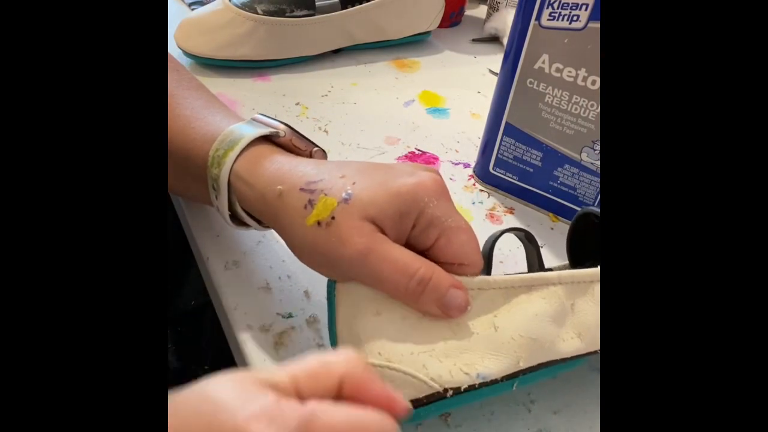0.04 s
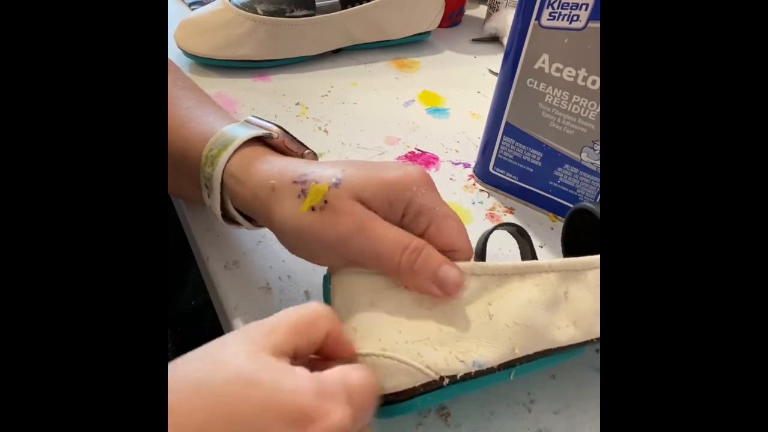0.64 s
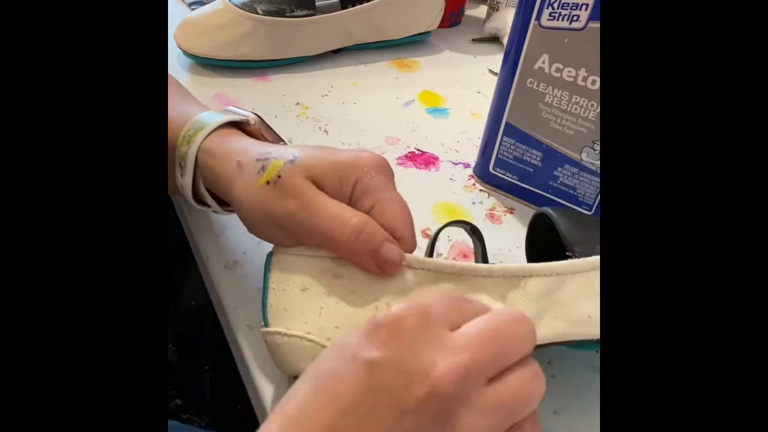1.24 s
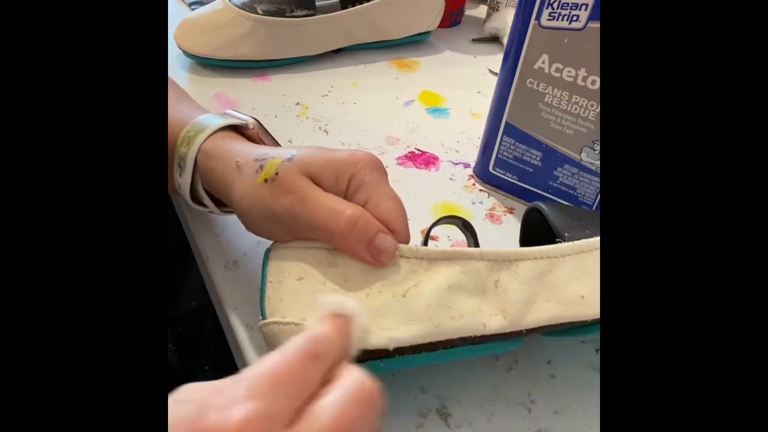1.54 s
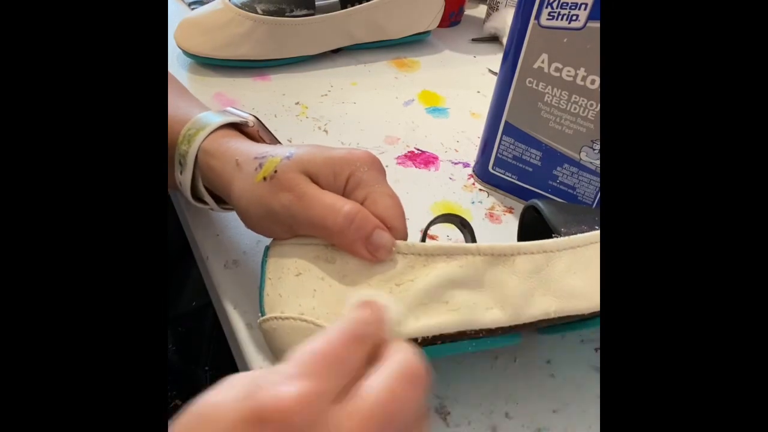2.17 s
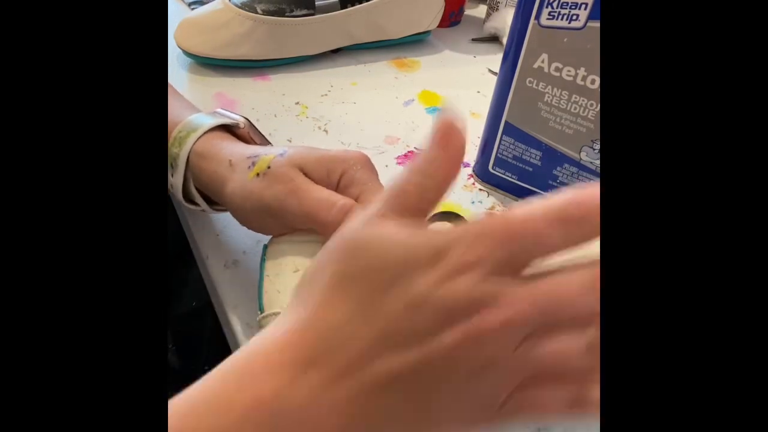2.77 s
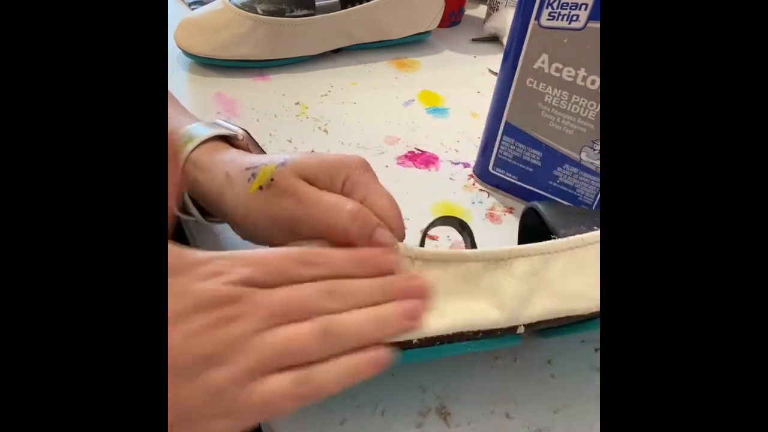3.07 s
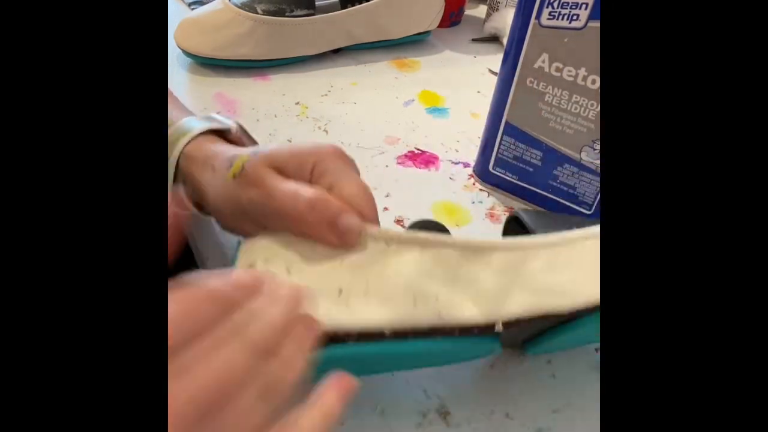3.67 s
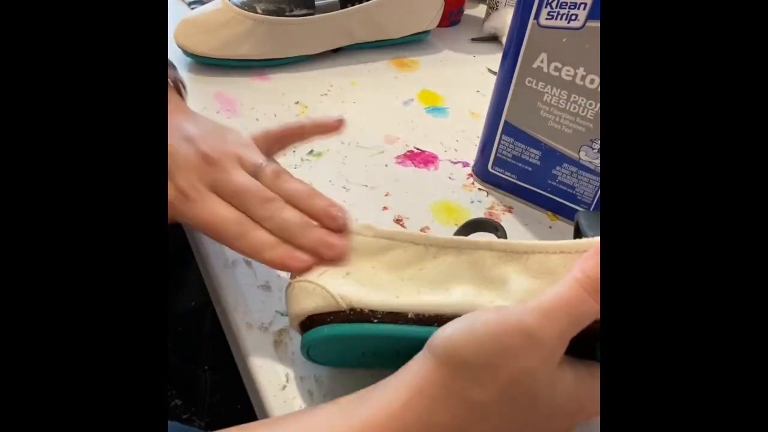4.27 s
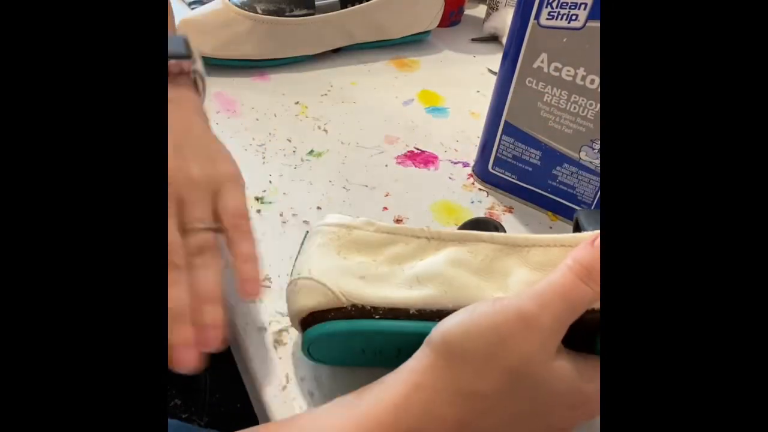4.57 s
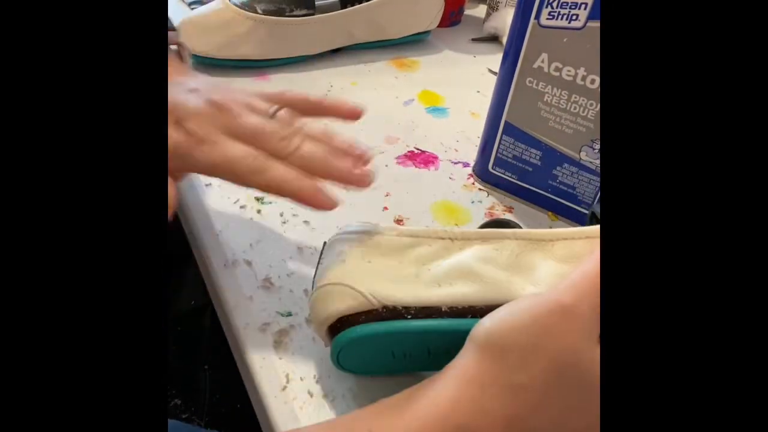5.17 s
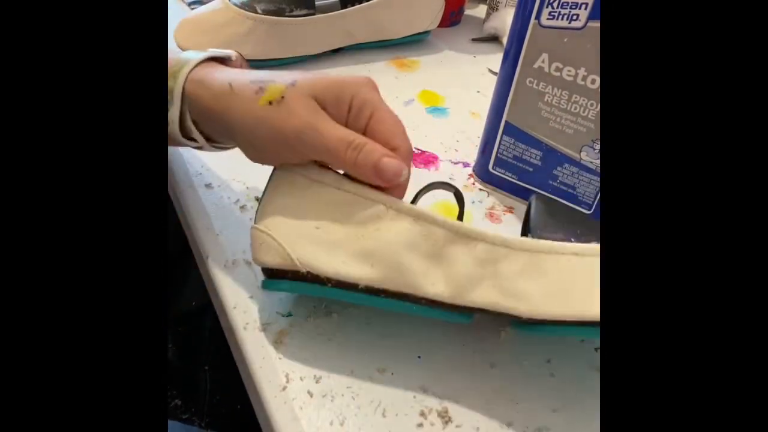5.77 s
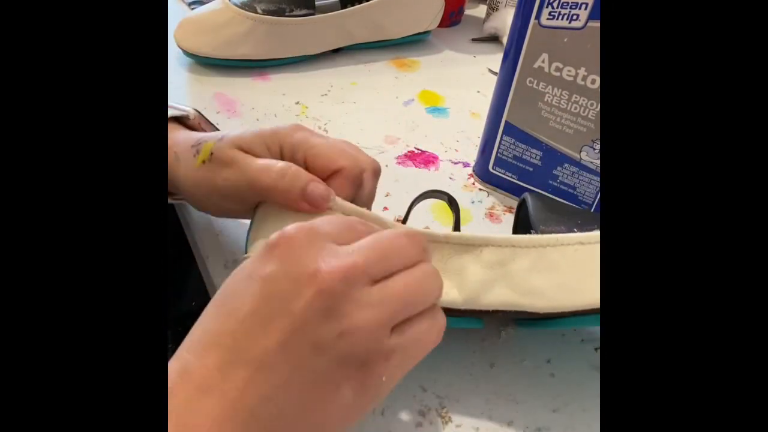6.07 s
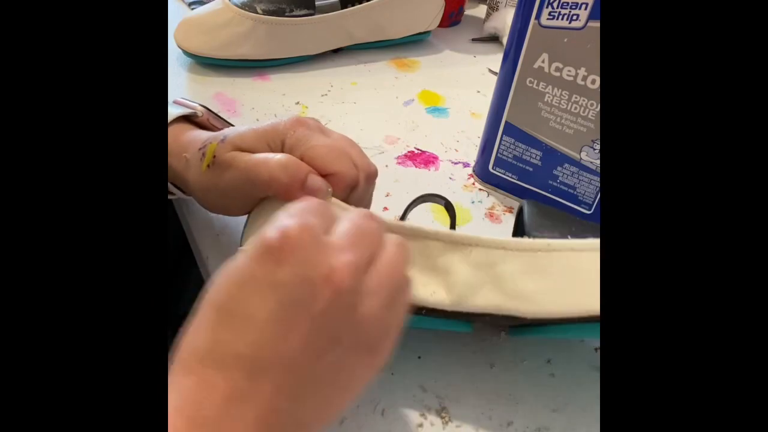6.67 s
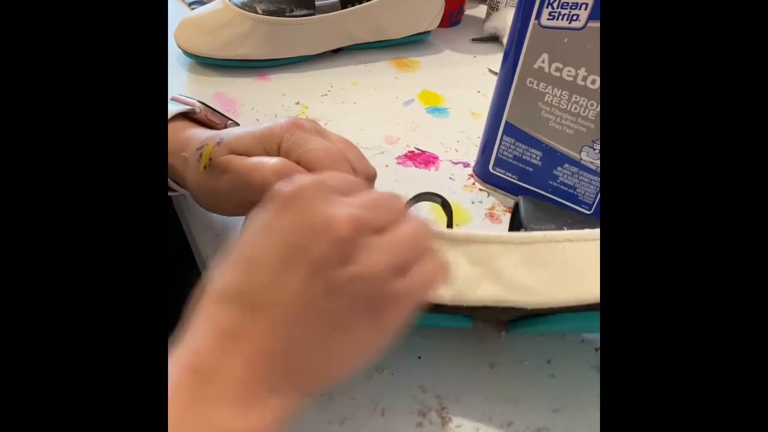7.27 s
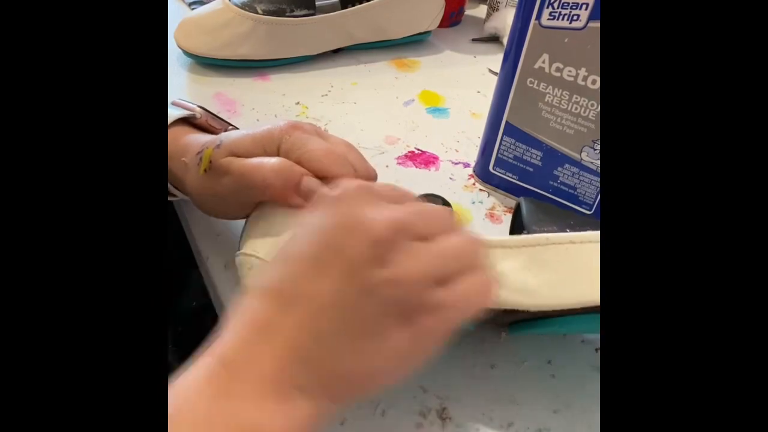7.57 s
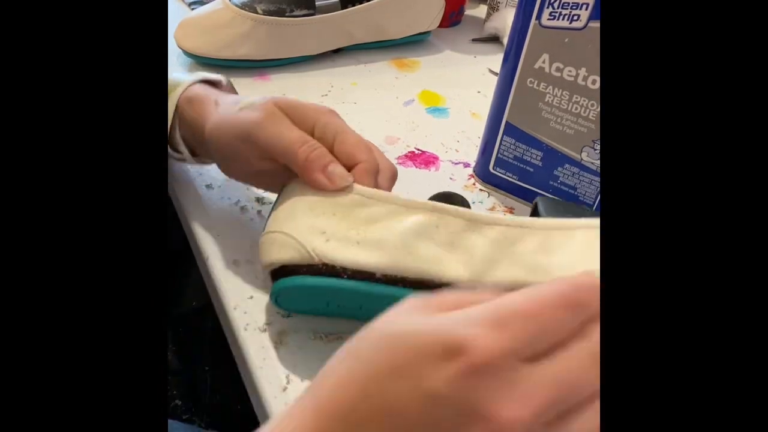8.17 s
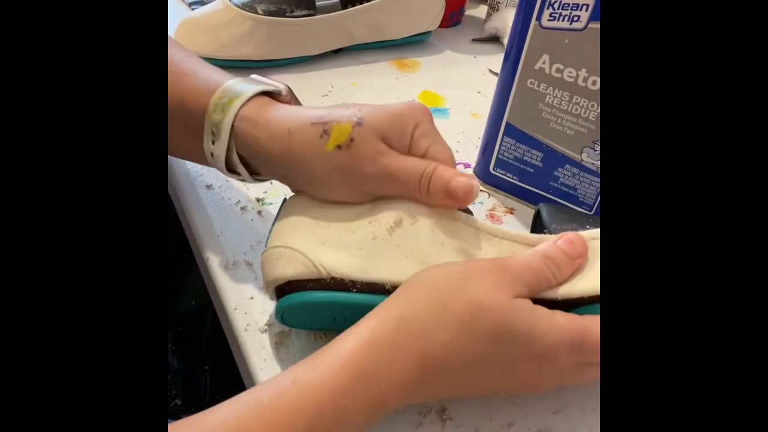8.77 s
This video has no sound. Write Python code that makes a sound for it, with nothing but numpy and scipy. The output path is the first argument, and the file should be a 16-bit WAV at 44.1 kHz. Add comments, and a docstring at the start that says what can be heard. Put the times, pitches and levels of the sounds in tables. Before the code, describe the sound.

Cotton wipes and quickly scrubs a leather shoe, with palm strokes and the sole knocking on a table.

```python
"""Cleaning a leather flat

A work table in a small room, a stereo microphone close to the shoe. A cotton ball wipes the leather,
a bare palm strokes it, then the cotton scrubs quickly to and fro: tiny slips make a rasp and a hiss,
and the hollows of shoe and hand colour the rasp. Fingers pat, tick and squeak once on the leather.
Whenever the shoe is turned, the sole knocks and sets the table ringing; at times the heel clacks too."""
import sys
import numpy as np
from scipy import signal
from scipy.fft import rfft, irfft, next_fast_len
from scipy.io import wavfile
from scipy.ndimage import uniform_filter1d

SR = 44100
rng = np.random.default_rng(int(sys.argv[2]) if len(sys.argv) > 2 else 0)


def master(y):
    """Save y as 16-bit WAV."""
    cut = np.clip(np.atleast_2d(y).T, -1, 1)
    pcm = np.round(cut * 32767)  # scale
    wavfile.write(sys.argv[1], SR, pcm.astype(np.int16))


N = 389844
TIME = np.arange(N) / SR


def from_db(db):
    return 10 ** (np.asarray(db) / 20)


def unit_power(x):
    return x / np.sqrt(np.mean(x ** 2) + 1e-20)


def add(out, start_s, sound):
    """Mix a sound in at its start time."""
    at = int(start_s * SR)
    out[..., at:at + sound.shape[-1]] += sound[..., :N - at]


def cut(x, hz, kind, order=2):
    """Low- or high-pass."""
    return signal.sosfilt(signal.butter(order, np.clip(hz, 15, .45 * SR), kind, fs=SR, output="sos"), x)


def colour(x, spectrum, tilt_db=0):
    """Give noise a spectrum, tilted by so many dB an octave; unit power."""
    size = next_fast_len(x.shape[-1])
    octave = np.log2(np.maximum(np.fft.rfftfreq(size, 1 / SR), 1))
    hz, db = np.transpose(spectrum)
    bass_fall = np.minimum(octave - np.log2(hz[0]), 0) * 20
    gain = from_db(np.interp(octave, np.log2(hz), db) + tilt_db * octave + bass_fall)
    return unit_power(irfft(rfft(x, size) * gain, size)[..., :x.shape[-1]])


def drift(per_s):
    """A random wavering with a spread of one."""
    knots = rng.standard_normal(int(N / SR * per_s) + 2)
    return unit_power(np.interp(TIME * per_s, np.arange(len(knots)), knots))


def stereo_noise(width, size=N):
    """White noise common to both sides, with a share that differs."""
    mid, side = rng.standard_normal((2, size))
    return unit_power(mid + width * side * np.array([[1], [-1]]))


def in_time(rows):
    """Join the rows of a curve by straight lines, one track for each column."""
    times, *columns = np.transpose(rows)
    return [np.interp(TIME, times, column) for column in columns]


def ringing(modes, t, longest_cycles=np.inf):
    """One dying sine for each mode, alternating in sign."""
    hz, db, t60 = np.transpose(modes)[:, :, None]
    t60 = np.minimum(t60, longest_cycles / hz)
    sign = (-1) ** np.arange(len(hz))[:, None]
    return sign * from_db(db - 60 * t / t60) * np.sin(2 * np.pi * hz * t)


# The air of the small room, behind everything. Each row: frequency in Hz, relative level in dB.
ROOM_SPECTRUM = [(25, -40), (50, -18), (80, -7), (120, 3.5), (200, -6.5), (300, -10), (450, -9),
                 (800, -19.5), (1500, -30), (3500, -38), (8000, -47), (16000, -55)]


def room_tone():
    """Faint steady air over a low rumble that wavers."""
    air = from_db(-54.3) * colour(stereo_noise(width=.29), ROOM_SPECTRUM)
    rumble = cut(air, 300, "low", order=1)
    return air - rumble + rumble * from_db(2.5 * drift(per_s=16))


def reflections(x, t60, wall_hz):
    """The near walls return a diffuse tail, different at each side and duller than the direct sound."""
    t = TIME[:SR // 2]
    tail = rng.standard_normal((2, len(t))) * (t > .004) * from_db(-60 * t / t60)
    tail /= np.sqrt(np.sum(tail[0] ** 2))
    tail = cut(tail, wall_hz, "low", order=1)
    tail = cut(tail, 490, "high", order=1)
    return signal.fftconvolve(x.mean(0)[None], tail, axes=1)[:, :N]


# The hollow heel. Each row: frequency in Hz, relative level in dB, seconds to fall 60 dB.
HEEL_MODES = [(465, -4, 0.12), (637, -0.5, 0.087), (832, -4.5, 0.055), (956, -3.5, 0.046),
              (1230, -15.5, 0.11), (3490, 2.5, 0.028)]
# The heel meets the table. Each row: start in seconds, relative level in dB, contact cut-off in Hz.
HEEL_TAPS = [(0.737, -34.5, 3000), (3.211, -43, 1200), (3.513, -26.5, 4520), (4.01, -37, 900),
             (5.552, -21, 5000), (8.063, -36, 735)]


def heel():
    """The hard edge of the heel gives a short, hollow, woody clack."""
    out = np.zeros(N)
    rings = ringing(HEEL_MODES, TIME[:SR // 4])
    for start, db, contact_hz in HEEL_TAPS:
        clack = (rings * from_db(rng.standard_normal((len(rings), 1)))).sum(0)
        add(out, start, from_db(db) * cut(clack, contact_hz, "low"))
    return out


# The shoe is bumped or set down, close to the microphone. Each row: time in seconds, relative thud in dB,
# contact cut-off in Hz, relative slap in dB, slap tilt in dB per octave, slap rise in seconds.
BUMPS = [(0.166, -43, 990, -31, -6.5, 0.0013), (0.187, -32, 158, -55, 6, 0.0016),
         (0.663, -36, 200, -29, 2.5, 0.002), (0.737, -33, 900, -21.5, 2, 0.0014),
         (0.925, -39.5, 190, -46.5, -0.5, 0.0017), (1.845, -12.5, 278, -16.5, 3, 0.0016),
         (3.214, -32.5, 400, -29.5, -2, 0.0032), (3.254, -30, 280, -41, 6, .008),
         (3.335, -31, 430, -30, 3.5, 0.0041), (3.423, -27, 160, -23.5, 0, 0.0013),
         (3.514, -15.5, 900, -21.5, -2, .0013), (4.01, -30.5, 675, -36.5, -1, 0.005),
         (4.022, -29.5, 332, -29.5, 0.5, 0.0008), (5.206, -40, 170, -48, 3, 0.0062),
         (5.246, -34, 397, -25, 2.5, 0.0026), (5.257, -30, 190, -30, 10, 0.0035),
         (5.273, -41, 302, -24, 4, 0.0011), (5.384, -27.5, 233, -29, 2, 0.0032),
         (5.552, -12.5, 900, -19, 1, 0.00092), (5.614, -19.5, 700, -25, -0.5, 0.00088),
         (5.706, -21, 159, -33.5, 2, 0.004), (5.832, -42, 249, -43.5, 6, 0.0073),
         (7.366, -32, 520, -40, 1, .0015), (8.063, -34.5, 600, -40.5, 1, 0.0014),
         (8.682, -39, 300, -41, -6, 0.0024)]
HARD_LANDING_DB, EDGE_LEAD_S = -17.5, .0055


def sole_contacts():
    """Each bump ends in a soft rebound; a hard landing touches with the edge first."""
    rebound_s, rebound_hz, edge_hz = .029, 482, 780
    for start, db, contact_hz, *_ in BUMPS:
        yield start, db, contact_hz
        yield start + rebound_s, db - 15, rebound_hz
        if db > HARD_LANDING_DB:
            yield start - EDGE_LEAD_S, db - 7, edge_hz


# The table top under the shoe. Each row: frequency in Hz, relative level in dB,
# seconds to fall 60 dB before the hands damp it.
TABLE_MODES = [(103, -8.5, 0.096), (163, 1, 0.042), (221.6, 1.5, 0.055), (300, -4, 0.034),
               (342, -2.5, 0.055), (457.7, -7.5, 0.077), (511, -15, 0.13), (766, -0.5, 0.016),
               (876, 1, 0.014), (2160, -12.5, 0.007)]
# The blur of weaker modes and loose things on the table. Each row: frequency in Hz, relative level in dB.
TABLE_WASH = [(50, -22), (110, 7.5), (220, 6), (450, -2), (850, -2), (1200, -22), (3400, -27),
              (6000, -16.5)]


def knocks(wash_db, wash_t60):
    """The sole sets the table ringing; a soft contact reaches only the low modes."""
    out, t = np.zeros((2, N)), TIME[:SR // 4]
    rings = ringing(TABLE_MODES, t, longest_cycles=80)
    wash_fade = from_db(wash_db - 60 * t / wash_t60)
    for start, db, contact_hz in [*sole_contacts(), *rocking_contacts()]:
        modes = rings * from_db(1.7 * rng.standard_normal((len(rings), 1)))
        wash = colour(stereo_noise(.25, len(t)), TABLE_WASH) * wash_fade
        blow = cut(modes.sum(0) + wash, contact_hz, "low")
        onset_rms = np.sqrt(np.mean(blow[:, :SR // 100] ** 2))
        add(out, start, from_db(db - 5) * blow / onset_rms)
    return cut(out, 71, "high", order=4)   # the knocks carry no deep bass


# The hollow of the shoe. Each row: frequency in Hz, width in Hz, gain added to the direct sound.
SHOE_RESONANCES = [(1476, 247, 2.95), (1726, 90, 1.9), (2113, 106, 2.76), (2430, 160, 0.78)]


def hollow_shoe(x):
    """The shoe under the hand resonates with whatever rubs or pats it."""
    return x + sum(gain * signal.lfilter(*signal.iirpeak(hz, hz / width, fs=SR), x)
                   for hz, width, gain in SHOE_RESONANCES)


# Fingertips on the leather. Each row: time in seconds, relative level in dB, tilt in dB per octave.
FINGER_TICKS = [(0.019, -46, -2), (0.065, -37, -6), (0.234, -46.5, -2.5), (0.508, -42, -10),
                (1.112, -42.5, 0), (2.191, -42, 2.5), (2.417, -37.5, 9.5), (2.6, -33, 13.5),
                (2.692, -46, 2.5), (2.848, -40, 2.5), (3.733, -38.5, -5.5), (3.847, -31.5, 7.5),
                (4.061, -38.5, 2.5), (5.421, -31.5, -2.5), (5.483, -29, -3), (5.936, -51.5, 4),
                (5.971, -47.5, 9.5), (7.977, -37, 7), (8.174, -42, 9.5), (8.241, -37, -12),
                (8.293, -33, -2), (8.569, -43, -6), (8.768, -39.5, -4)]
TICK_RISE_S = .0014


def skin_contacts():
    """The slap of each bump, double in a hard landing, and the ticks of the fingertips."""
    slaps, edges = [], []
    for start, thud_db, _, db, tilt_db, rise_s in BUMPS:
        slaps.append((start, db, tilt_db, rise_s))
        if thud_db > HARD_LANDING_DB:
            edges.append((start - EDGE_LEAD_S, db - 3.5, tilt_db, rise_s))
    return slaps + edges + [(*tick, TICK_RISE_S) for tick in FINGER_TICKS]


# A slap on leather, heard close up. Each row: frequency in Hz, relative level in dB.
SLAP_SPECTRUM = [(300, -4), (1000, 4), (1550, -2.5), (2050, -3.5), (2700, -3.5), (3450, 1), (4300, -4.5),
                 (5100, -5.5), (6300, -9), (10000, -16), (15000, -19)]


def pats(tail_db, tail_t60, snap):
    """Skin brushes in and lands with a crack, and the shoe rings; a soft pad is slower and snaps less."""
    lead_s = .015
    out, t = np.zeros((2, N)), TIME[:SR // 4] - lead_s
    after = np.maximum(t, 0)
    for landing, db, tilt_db, rise_s in skin_contacts():
        brush_in = np.exp(np.minimum(t, 0) / rise_s)
        crack = np.exp(-after / (1.4 * rise_s))
        tail = from_db(tail_db - 60 * after / tail_t60)
        contact = brush_in * (crack + tail) * stereo_noise(.68, len(t))
        contact[:, int(lead_s * SR)] += snap * TICK_RISE_S / rise_s
        pat = colour(hollow_shoe(contact), SLAP_SPECTRUM, tilt_db)
        add(out, landing - lead_s, from_db(db - 24) * pat)
    return out


def squeak(start, end, hz, width_hz, db):
    """A fingertip sticks and slips unevenly on the leather: a short, hoarse whistle."""
    slips = signal.lfilter(*signal.iirpeak(hz, hz / width_hz, fs=SR), rng.standard_normal(N))
    swell = np.sin(np.pi * np.interp(TIME, [start, end], [0, 1]))
    return from_db(db) * unit_power(slips) * swell


def cupped_hand(x, swing_octaves, centre_hz=1780, width_hz=290, gain=1.35):
    """The hollow of the hand adds a resonance that wanders and swings as the hand moves."""
    hz = centre_hz * 2 ** (swing_octaves + .24 * drift(per_s=28))
    carrier = np.exp(2j * np.pi * np.cumsum(hz) / SR)
    pole = np.exp(-np.pi * width_hz / SR)
    resonance = 2 * np.real(carrier * signal.lfilter([1 - pole], [1, -pole], x * carrier.conj()))
    return x + gain * resonance


def friction(spectrum, rasp, hiss, swing_octaves, catches_per_s, catch_db, width):
    """Tiny slips make a grainy rasp, fine texture a smoother hiss, and the grain catches with ticks."""
    hiss_edge_hz = 3800
    noise = colour(stereo_noise(width), spectrum)
    grain_db = 2 * drift(per_s=900) + 1.3 * drift(per_s=90)
    low = cut(noise, hiss_edge_hz, "low", order=3) * from_db(grain_db)
    high = cut(noise, hiss_edge_hz, "high", order=3) * from_db(.5 * grain_db)
    catches = (rng.random(N) < catches_per_s / SR) * rng.uniform(-.8, 1, N)
    ticks = colour(cut(catches, hiss_edge_hz, "low", order=1), SLAP_SPECTRUM)
    tick_level = from_db(catch_db) * np.sqrt(np.abs(rasp))   # even a slow, light touch catches
    body = cupped_hand(hollow_shoe(low), swing_octaves)
    return rasp * unit_power(body) + hiss * unit_power(high) + tick_level * ticks


def stroke_speed(start, fastest, end):
    """The hand speeds up and slows again over one stroke."""
    t = TIME[int(start * SR):int(end * SR)]
    return np.abs(np.sin(np.pi * np.interp(t, [start, fastest, end], [0, .5, 1])))


# The fingers shift their grip on the shoe. Each row: start and end in seconds, rustle level in dB.
GRIPS = [(0.112, 0.195, -61), (0.54, 0.645, -63.5), (0.91, 1.106, -64), (1.85, 1.927, -43),
         (2.59, 2.824, -74.5), (2.832, 2.93, -55), (3.203, 3.314, -47), (3.299, 3.527, -57),
         (3.665, 3.916, -63.5), (4.01, 4.187, -53), (4.648, 4.877, -64.5), (5.222, 5.296, -48.5),
         (5.371, 5.758, -54.5), (5.562, 5.667, -59), (5.834, 5.995, -63), (7.995, 8.123, -64.5),
         (8.199, 8.332, -55.5), (8.585, 8.62, -50), (8.61, 8.688, -63), (8.67, 8.811, -54.5)]


def grip_level(attack_s=.0063, release_s=.045):
    """Each change of grip starts quickly, wavers as the fingers fumble, and lets go."""
    held = np.zeros(N)
    for start, end, db in GRIPS:
        ramps = np.minimum((TIME - start) / attack_s, (end - TIME) / release_s)
        held += from_db(db) * np.clip(ramps, 0, 1)
    return held * from_db(3 * drift(per_s=25))


# Bare skin on leather, heard close up. Each row: frequency in Hz, relative level in dB.
SKIN_SPECTRUM = [(200, -11), (450, -15), (1100, -5), (1550, -8.5), (2400, -10.5), (2820, -5.5),
                 (3200, -7.5), (3900, -14), (6600, -9.5), (10000, -17.5), (15000, -18)]
# The palm's strokes. Each row: start, fastest moment and end in seconds, rasp and hiss levels in dB.
PALM_STROKES = [(0.313, 0.386, 0.42, -49, -66), (2.811, 3.065, 3.12, -40.5, -53),
                (3.477, 3.56, 3.687, -38.5, -54.5), (4.112, 4.226, 4.292, -39, -52.5),
                (4.377, 4.483, 4.52, -42.5, -45), (4.642, 4.745, 4.81, -55, -51),
                (4.835, 5.003, 5.12, -40, -47), (8.32, 8.407, 8.48, -52, -61.5)]


def palm():
    """Skin slides over the leather, swelling with its speed; the pressure rumbles through the shoe."""
    rasp = grip_level()
    hiss = from_db(-7) * rasp
    for start, fastest, end, rasp_db, hiss_db in PALM_STROKES:
        speed = stroke_speed(start, fastest, end)
        add(rasp, start, from_db(rasp_db) * speed ** 3)
        add(hiss, start, from_db(hiss_db) * speed ** 2)
    rub = friction(SKIN_SPECTRUM, rasp, hiss, swing_octaves=0, catches_per_s=25, catch_db=-38, width=.77)
    rumble = from_db(-9.5) * rasp * colour(stereo_noise(width=.13), TABLE_WASH)
    return rub + rumble


# The pace of the scrub. Each row: time in seconds, strokes per second.
SCRUB_PACE = [(6.04, 10), (6.12, 8), (6.17, 15.4), (6.42, 17.1), (6.97, 17.35), (7.18, 15.05),
              (7.42, 15.35), (7.6, 11.7), (7.86, 14.25), (7.995, 5)]


def scrub_phase():
    """Running count of the scrub's strokes; the hand turns round at each whole number."""
    return np.cumsum(np.interp(TIME, *np.transpose(SCRUB_PACE), left=0, right=0)) / SR


# How much the cotton shakes the shoe on the table. Each row: time in seconds, multiple of the rasp.
SHAKING = [(6.6, 0.27), (7.38, 1.78), (7.62, 0.52), (8.0, 0.84)]


def rocking_contacts(contact_hz=288):
    """In mid-stroke of the scrub the shoe rocks onto the table, less on the way back."""
    phase = scrub_phase()
    shaking, = in_time(SHAKING)
    for stroke in range(round(phase[-1])):
        at = min(np.searchsorted(phase, stroke + .49), N - 1)
        db = -36.5 + 20 * np.log10(shaking[at]) - 6 * (stroke % 2)
        yield TIME[at], db + rng.uniform(-2, 1), contact_hz


# How hard the cotton scrubs. Each row: time in seconds, relative levels of rasp and hiss in dB.
SCRUB_EFFORT = [(6.078, -51, -64), (6.25, -48.5, -60.5), (6.45, -47.5, -57.5), (6.72, -48.5, -58),
                (6.85, -50, -60), (7.1, -47.5, -58.5), (7.46, -46.5, -58.5), (7.62, -48.5, -62),
                (7.93, -48.5, -60.5)]


def scrub_levels(stick_share, turn_share):
    """Rasp and hiss follow the speed of the cotton, which sticks at each turn of the scrub."""
    phase = scrub_phase()
    rasp_db, hiss_db = in_time(SCRUB_EFFORT)
    # no two strokes press quite alike
    uneven_db = 1.5 * rng.uniform(-2.25, 1, int(phase[-1]) + 1)[phase.astype(int)]
    speed = np.maximum(np.abs(np.sin(np.pi * phase)) - stick_share, 0) / (1 - stick_share)
    moving = (TIME > SCRUB_PACE[0][0]) & (TIME < SCRUB_PACE[-1][0])
    rasp = from_db(rasp_db + uneven_db) * (turn_share + speed ** .51)
    hiss = from_db(hiss_db) * (turn_share + speed ** .67)
    return uniform_filter1d(np.array([rasp, hiss]) * moving, size=200)


# Cotton on leather close to the microphone, and the high sheen of its fibres.
# Each row: frequency in Hz, relative level in dB.
COTTON_SPECTRUM = [(200, -0.5), (450, -3.5), (680, -4), (950, -2), (1500, -9), (2300, -8), (3000, -10),
                   (4400, -12), (7000, -8), (10000, -12), (16000, -17)]
SHEEN_SPECTRUM = [(11500, -22), (13700, -1), (15800, -2)]
# Single wipes of the cotton ball. Each row: start, fastest moment and end in seconds, rasp level in dB.
COTTON_WIPES = [(1.101, 1.14, 1.226, -53), (1.222, 1.267, 1.302, -49.5), (1.327, 1.404, 1.414, -51.5),
                (1.432, 1.495, 1.507, -53.5), (1.537, 1.602, 1.645, -52.5), (1.65, 1.722, 1.72, -53),
                (1.757, 1.806, 2, -55), (2.039, 2.08, 2.177, -53.5), (2.186, 2.225, 2.272, -51),
                (2.287, 2.327, 2.41, -45.5), (2.404, 2.415, 2.49, -45.5), (2.478, 2.508, 2.55, -44)]


def cotton():
    """Soft fibres rub in slow wipes, then in a fast scrub, brighter one way; they shake the shoe too."""
    rasp, hiss = scrub_levels(stick_share=.1, turn_share=.032)
    for start, fastest, end, rasp_db in COTTON_WIPES:
        speed = stroke_speed(start, fastest, end)
        add(rasp, start, from_db(rasp_db) * speed ** 1.32)
        add(hiss, start, from_db(-63) * speed ** .55)
    swing_octaves = -.15 * np.sin(np.pi * scrub_phase())
    rub = friction(COTTON_SPECTRUM, rasp, from_db(6) * hiss, swing_octaves,
                   catches_per_s=18, catch_db=-41, width=.48)
    sheen = .63 * hiss * colour(stereo_noise(width=.19), SHEEN_SPECTRUM)
    shaking, = in_time(SHAKING)
    shake_spectrum = [(110, -11), (220, .5), (330, -11.5), (600, -33), (1500, -53)]   # Hz, dB
    shake = rasp * shaking * colour(stereo_noise(width=.11), shake_spectrum)
    return rub + sheen + shake


def scene():
    """The shoe lies close and slightly to the right, so it reaches the microphone's left side later."""
    thuds = knocks(wash_db=-5, wash_t60=.19) * from_db([[-.4], [.4]])
    hands = cotton() + palm()
    hands += squeak(start=8.67, end=8.79, hz=3400, width_hz=250, db=-56)
    hands += pats(tail_db=-12, tail_t60=.1, snap=4.2)
    shoe = hands + thuds + heel()
    left_lag_samples = 3
    direct = np.array([np.roll(shoe[0], left_lag_samples), shoe[1]])
    return direct + from_db(-10) * reflections(shoe, t60=.31, wall_hz=7100) + room_tone()


def record(dry):
    """The recorder cuts the top steeply above 16 kHz."""
    return signal.sosfilt(signal.ellip(10, .1, 70, 16000, fs=SR, output="sos"), dry)


dry = scene()
out = record(dry)
master(out)
```